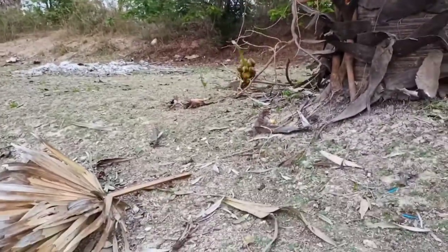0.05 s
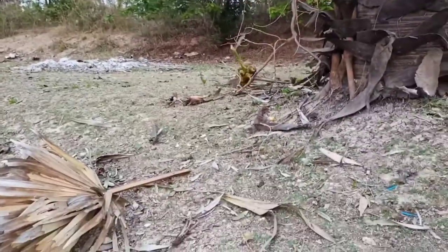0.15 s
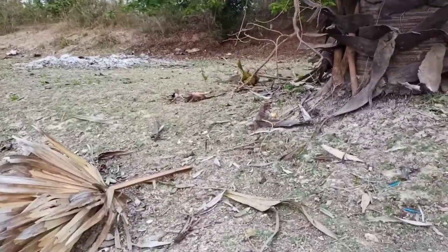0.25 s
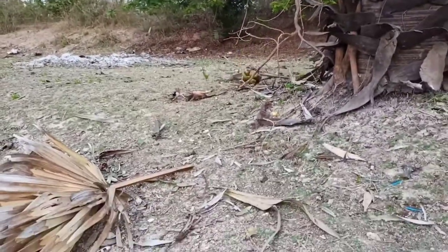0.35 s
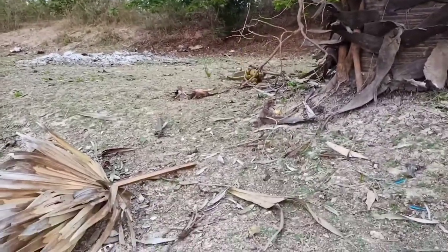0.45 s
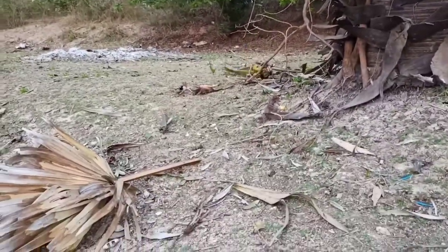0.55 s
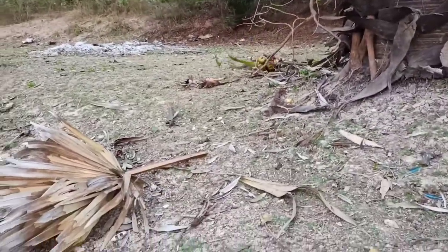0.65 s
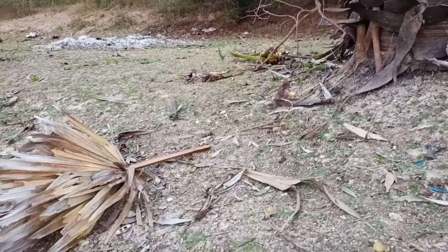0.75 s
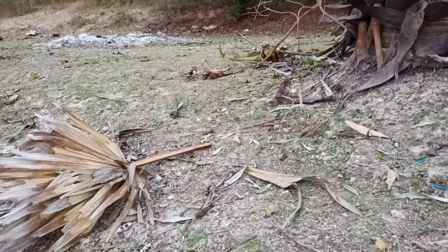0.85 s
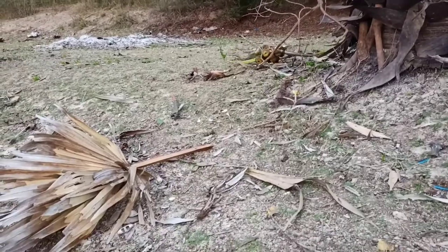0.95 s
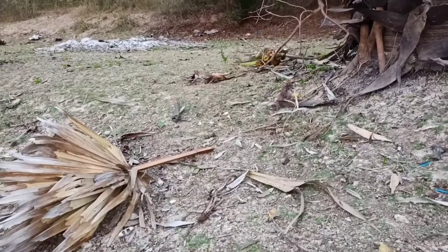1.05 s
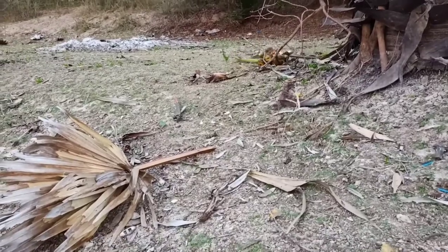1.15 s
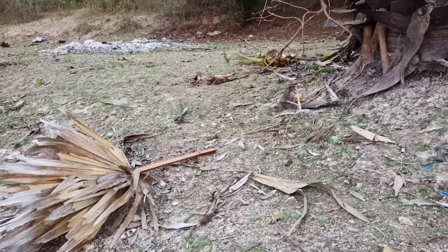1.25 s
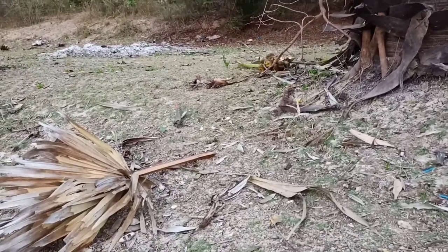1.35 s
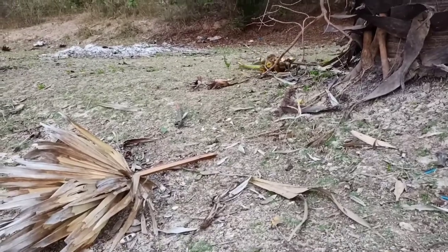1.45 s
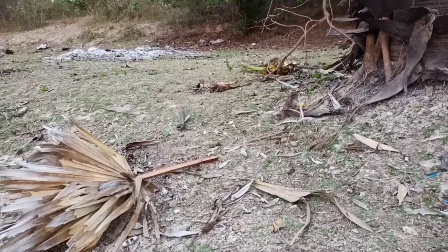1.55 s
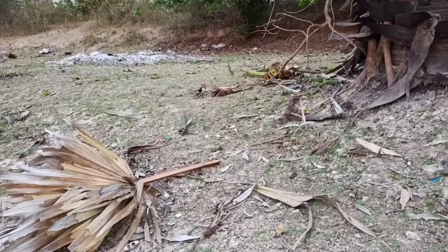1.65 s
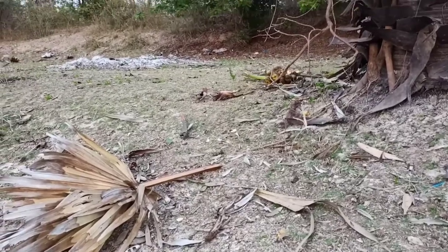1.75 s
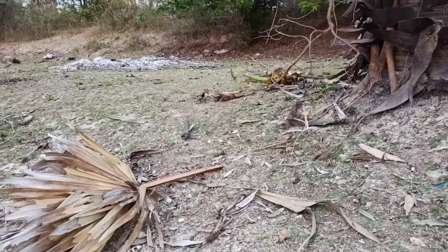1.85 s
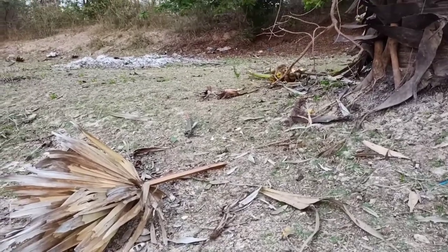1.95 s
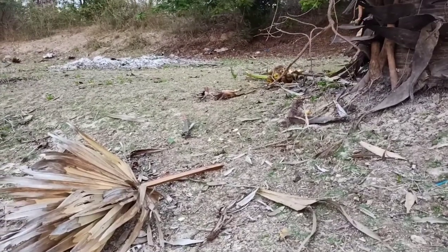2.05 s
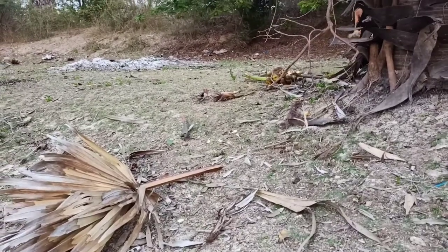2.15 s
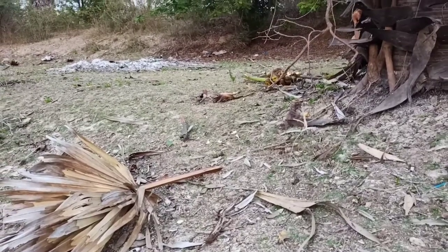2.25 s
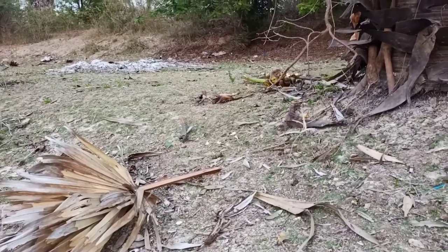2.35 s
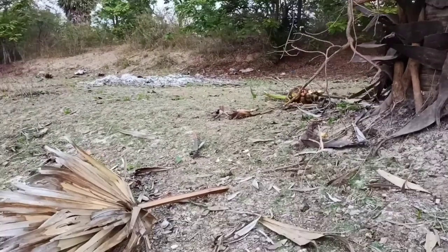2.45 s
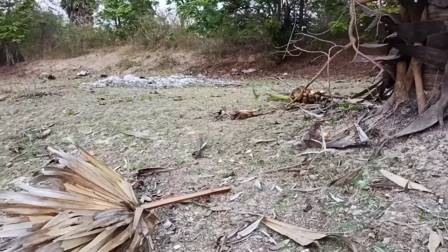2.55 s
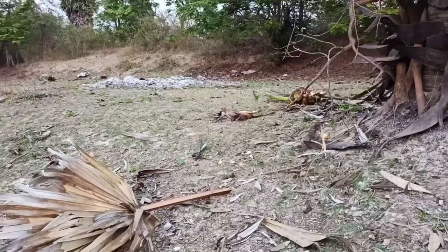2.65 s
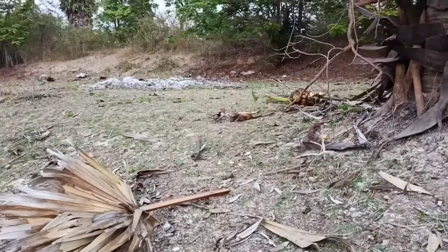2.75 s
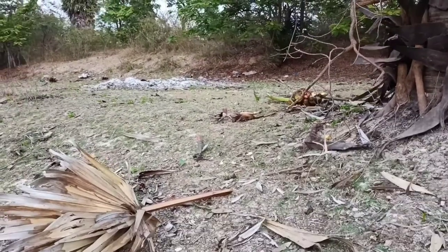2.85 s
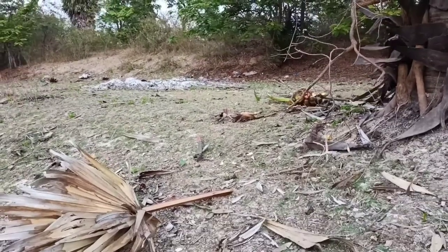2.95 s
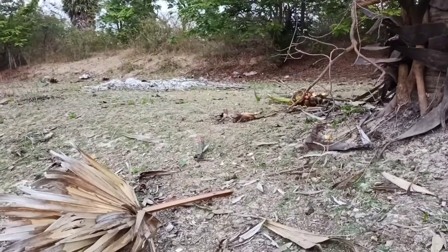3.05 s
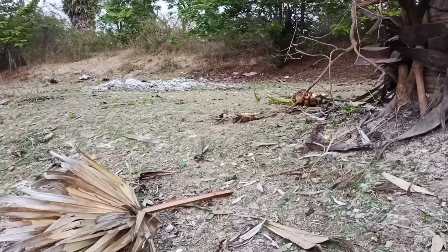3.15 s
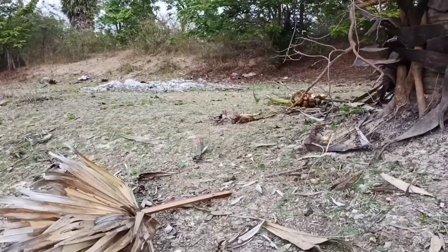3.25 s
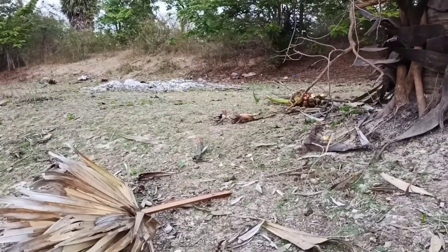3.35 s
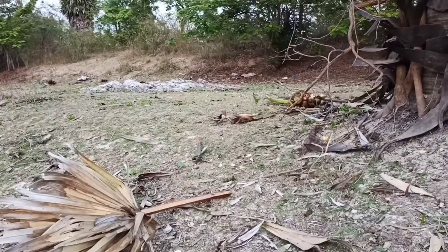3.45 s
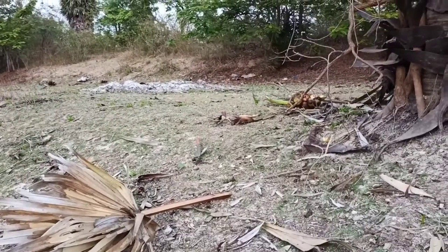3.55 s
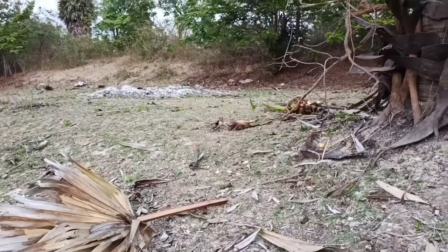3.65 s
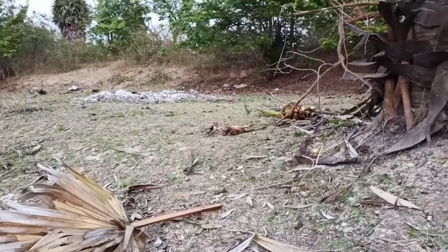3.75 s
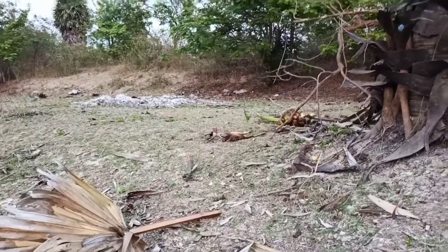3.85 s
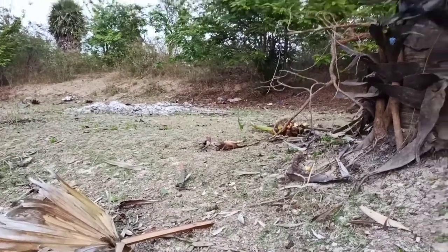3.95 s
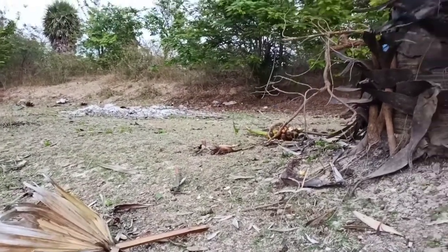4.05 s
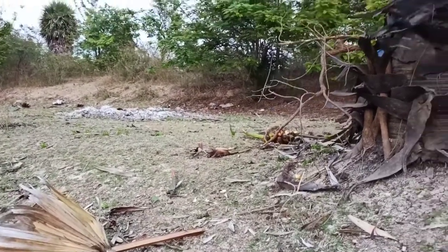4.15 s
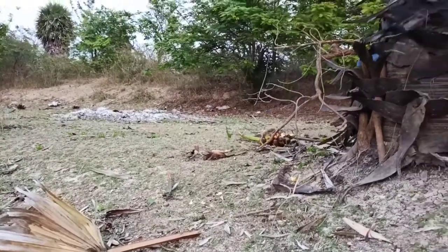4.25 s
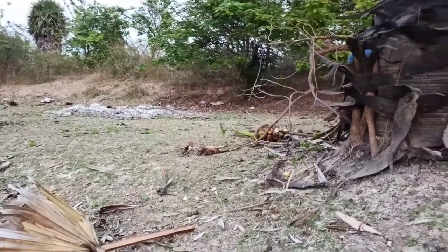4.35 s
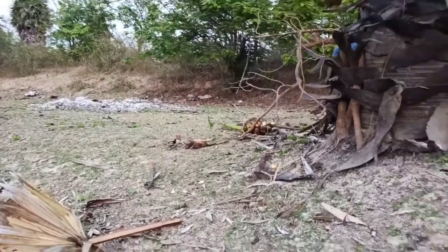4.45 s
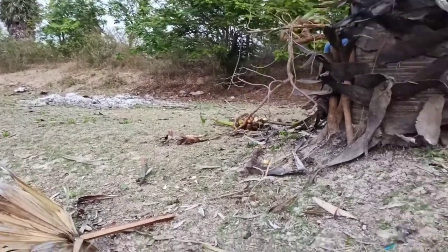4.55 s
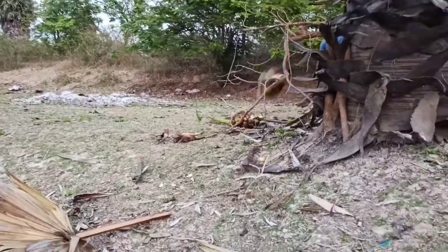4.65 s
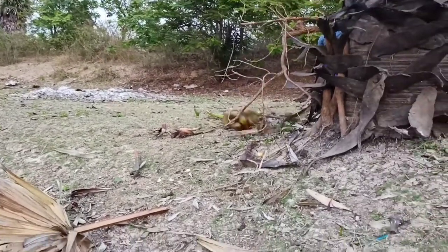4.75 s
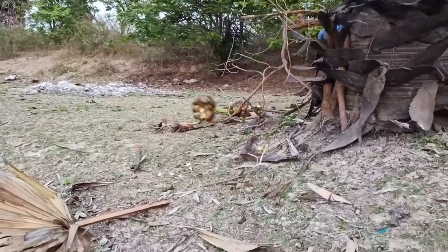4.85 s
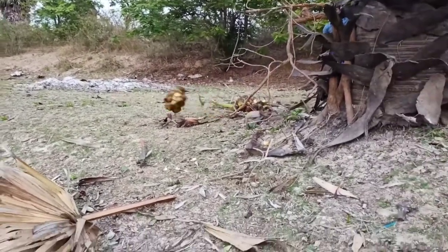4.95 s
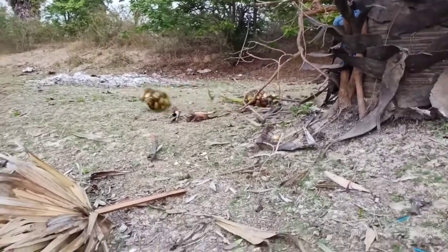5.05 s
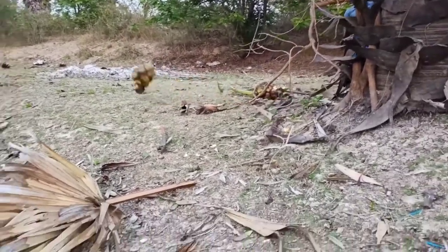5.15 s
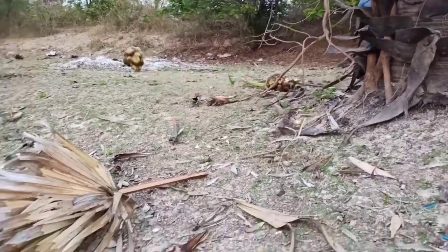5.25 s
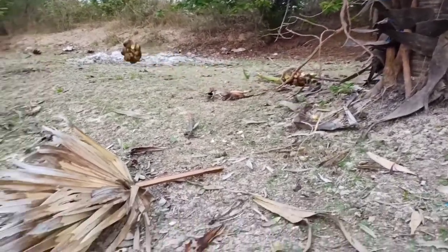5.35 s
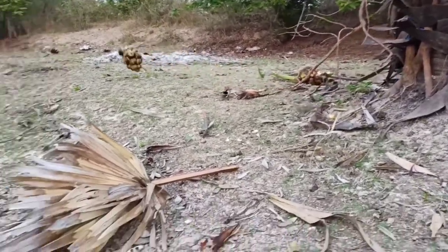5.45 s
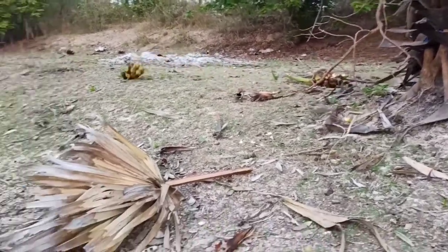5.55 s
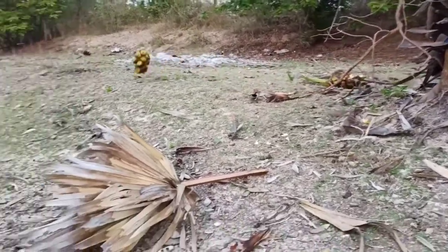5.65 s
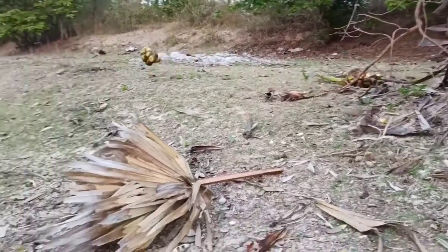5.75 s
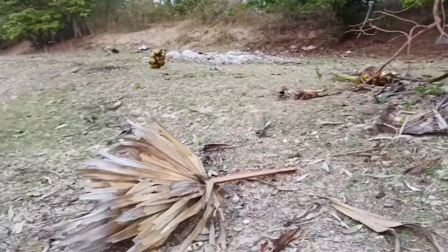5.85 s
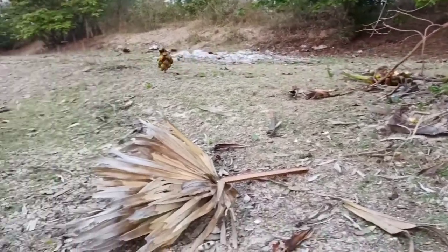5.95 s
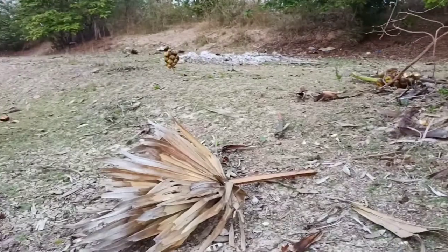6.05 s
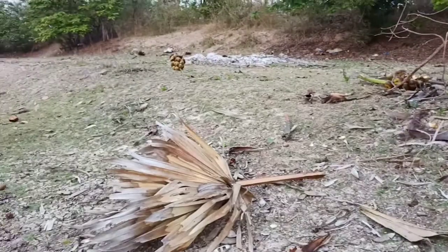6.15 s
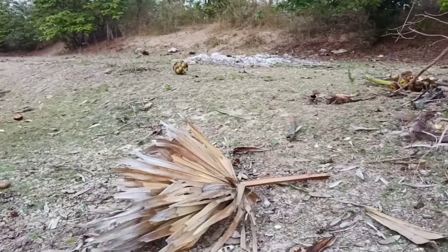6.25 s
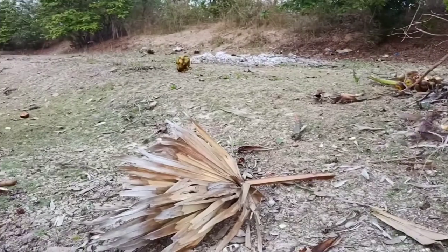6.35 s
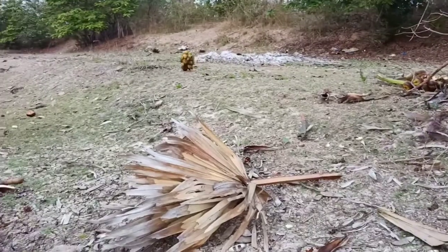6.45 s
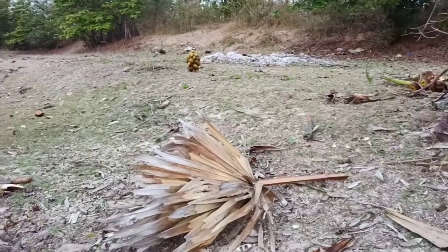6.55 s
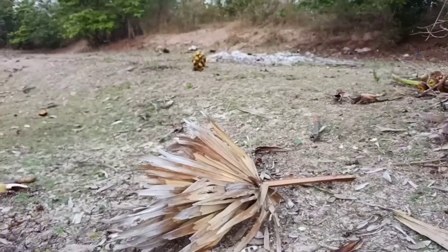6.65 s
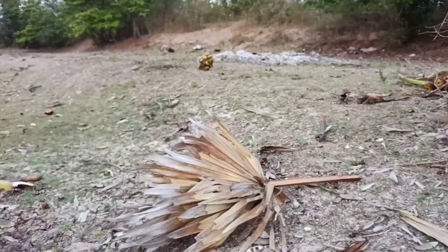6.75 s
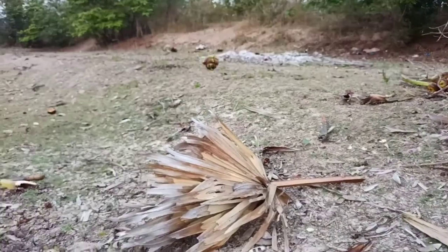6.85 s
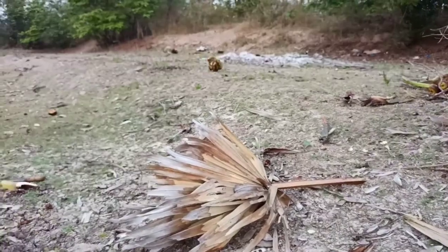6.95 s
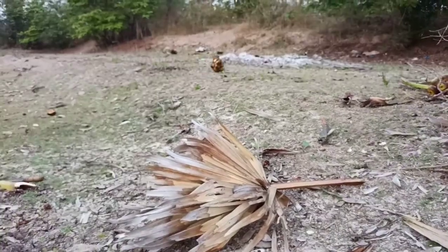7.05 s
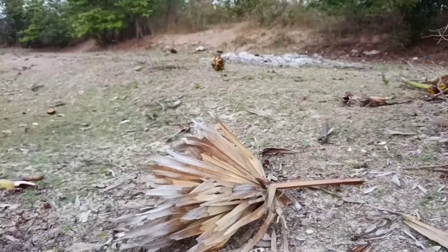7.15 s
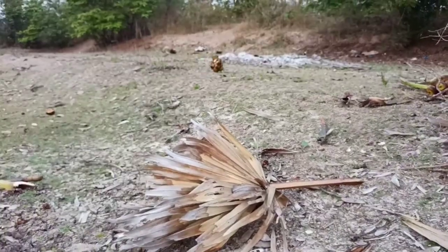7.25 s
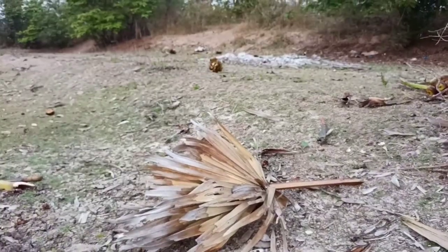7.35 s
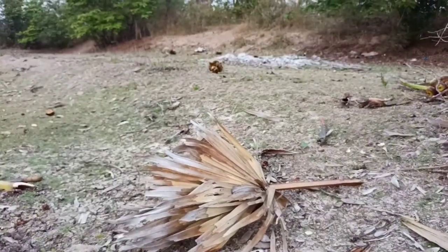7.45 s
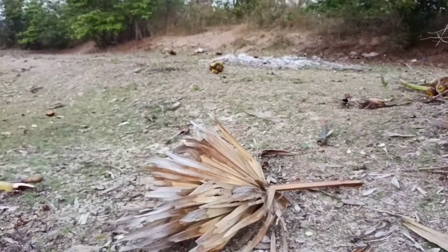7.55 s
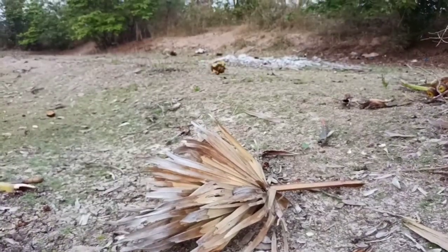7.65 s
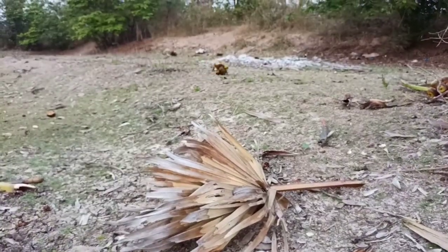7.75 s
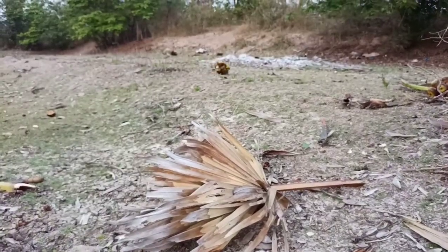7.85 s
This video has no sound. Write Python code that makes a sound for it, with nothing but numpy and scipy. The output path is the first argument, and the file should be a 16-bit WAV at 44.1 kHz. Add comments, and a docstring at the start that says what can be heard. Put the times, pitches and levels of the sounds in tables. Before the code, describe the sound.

Heard on a phone in the open: brisk dry leaf snaps and rustling die away within a second, leaving breeze, faint cicada buzz and far whistling birds. After a momentary total silence, a short woody chop knocks up in a tree. A pause, then a violent burst of splintering leaves, knocking hollow stalks and dull earth thuds as heavy fruit lands and tumbles, thinning to sparse crackles and calm.

```python
"""Heavy fruit bunches drop from a palm onto dry ground and roll through dead fronds, a few metres from a phone.
Close by, dry leaves crack as noise bursts, litter rustles in dense tiny snaps, hollow stalks knock as
decaying modes and the soil thuds in low sagging tones. Behind lie buzzing cicadas, gliding whistles of
far birds and light wind as flickering noise. The sound cuts out for a moment just before a lone chop
up in the crown. Table levels are nominal, ahead of the microphone."""
import sys
import numpy as np
from scipy import signal
from scipy.fft import rfft, irfft, next_fast_len
from scipy.io import wavfile
from scipy.ndimage import uniform_filter1d

SR = 44100
rng = np.random.default_rng(int(sys.argv[2]) if len(sys.argv) > 2 else 0)


def inscribe(sig):
    """Save sig as 16-bit PCM at rate SR to the path in sys.argv[1].

    A 1-D sig is mono; a 2-D sig holds one channel per row.
    Samples are clipped to [-1, 1] before scaling.
    """
    pcm = np.round(np.clip(np.atleast_2d(sig).T, -1, 1) * 32767)
    wavfile.write(sys.argv[1], SR, pcm.astype(np.int16))


N = 347949  # samples


def undb(db):
    """Gain from dB."""
    return 10 ** (np.asarray(db) / 20)


def unit(x):
    """x scaled to rms 1."""
    return x / np.sqrt(np.mean(x ** 2))


def noise(n):
    """White noise of n samples."""
    return rng.standard_normal(n)


def band(x, lo_hz, hi_hz):
    """x band-passed between two frequencies."""
    return signal.sosfilt(signal.butter(2, [lo_hz, hi_hz], "band", fs=SR, output="sos"), x)


def decay(t, t60):
    """Exponential fall by 60 dB in t60 seconds."""
    return 1000. ** (-t / t60)


def colour(x, table):
    """x filtered to a spectrum of (f/Hz, level/dB) points joined over log frequency, rms 1."""
    size = next_fast_len(N)
    hz, db = np.transpose(table)
    f = np.maximum(np.arange(size // 2 + 1) * SR / size, 1)
    gain = undb(np.interp(np.log(f), np.log(hz), db))
    return unit(irfft(rfft(x, size) * gain, size)[:N])


def curves(tables, off_db=-120):
    """Columns of (t/s, level/dB, ..) tables over the whole time; the level is off_db outside the tables."""
    t, out = np.arange(N) / SR, None
    inside = np.zeros(N, bool)
    for table in tables:
        s, *columns = np.transpose(table)
        rows = np.array([np.interp(t, s, c) for c in columns])
        if out is None:
            out = rows * 0 + rows[:, :1]
        out[:, t >= s[0]] = rows[:, t >= s[0]]
        inside |= (t >= s[0]) & (t <= s[-1])
    return np.where(inside, out[0], off_db), *out[1:]


def walk(rate):
    """Random levels held 1 / rate seconds and smoothed twice, rms 1."""
    hold = int(SR / rate)
    steps = np.repeat(noise(N // hold + 1), hold)
    return unit(uniform_filter1d(uniform_filter1d(steps, hold), hold)[:N])


def add(out, s, sound):
    """Mixes sound into out from time s."""
    i = int(max(s, 0) * SR)
    out[i:i + len(sound)] += sound[:N - i]


def snaps(rate, spread_db, t60):
    """Envelope of tiny decaying snaps of very unequal size, about rate per second at random times, rms 1."""
    chance = rng.random(N) * SR / rate
    size = np.maximum(chance, np.exp(-2.4)) ** (-spread_db * np.log(10) / 20)
    clicks = np.where(chance < 1, size, 0)
    return unit(signal.lfilter([1], [1, -np.exp(-np.log(1000) / (t60 * SR))], clicks))


def leaves():
    """Litter noise in which each part of the spectrum crackles partly on its own."""
    # overall tone of the litter: [f/Hz, level/dB per Hz]
    litter_tone = [(410, -32.5), (700, -15.5), (1050, -18.5), (1660, -14.5), (2840, -12.5), (3900, -9.5),
                   (6570, -6), (9000, -17.5), (14500, -19.5), (16000, -29)]
    together = snaps(150, 6.1, 0.045)
    edges = np.geomspace(500, 17000, 13)  # Hz
    total = np.zeros(N)
    for lo, hi in zip(edges, edges[1:]):
        crackle = 0.55 + 0.25 * together + 0.45 * snaps(55, 10.0, 0.018)
        total += band(noise(N), lo, hi) * crackle
    return colour(total, litter_tone)


def roll():
    """Litter rustles in dense small snaps, stalks rattle and the soil rumbles under the moving bunch."""
    # the bunches dragging through litter, one table per passage:
    # [t/s, rustle level/dB, stalk rattle level/dB re rustle, soil rumble level/dB re rustle]
    passages = [
        [(0, -34, -1, -13), (.264, -39.5, -10, -6), (.448, -42, -11.5, -3), (.612, -43, -7, -1),
         (.744, -56, -12, 2), (1.0, -54.5, -21, 1.5), (1.4, -66, -8, -16.5)],
        [(4.3, -61, -14, 0.5), (4.4, -43.5, -13, 11.5), (4.53, -28, -11.5, -11.5), (4.73, -36.5, -10.5, -5.5),
         (4.82, -37, -21, 2.5), (5.23, -38.5, -15.5, 2), (5.44, -45, -2, -8.5), (5.69, -45.5, -4.5, 3.5),
         (5.86, -56.5, 1, 4), (6.4, -71, 10, 18), (6.9, -87, 10, 12)],
    ]
    # leaves crushed or swept for a moment: [start t/s, length/s, level/dB]
    sweeps = [(0.107, 0.036, -24), (0.225, 0.08, -40), (0.258, 0.071, -46), (0.787, 0.22, -51.5),
              (1.194, 0.11, -41), (1.545, 0.038, -53), (2.487, 0.093, -46), (3.702, 0.076, -61),
              (4.072, 0.12, -49), (4.334, 0.13, -28.5), (4.498, 0.16, -20), (4.743, 0.053, -40),
              (4.809, 0.091, -20), (4.992, 0.15, -40), (5.191, 0.041, -37.5), (5.272, 0.032, -33),
              (5.506, 0.03, -40), (5.646, 0.032, -26), (5.994, 0.15, -47), (6.338, 0.09, -48),
              (6.793, 0.17, -55.5)]
    db, rattle_db, rumble_db = curves(passages)
    litter = leaves()
    rattle = unit(band(noise(N), 150, 900)) * (0.47 + 0.58 * snaps(51, 3.9, 0.057))
    rumble = unit(band(noise(N), 37, 210)) * undb(2.8 * walk(30))
    out = undb(db) * (litter + undb(rattle_db) * rattle + undb(rumble_db) * rumble)
    # crushed leaves are fuller between these two frequencies
    crushed = 0.65 * litter + 0.52 * band(litter, 1200, 7500) + 0.29 * rattle
    for s, length, sweep_db in sweeps:
        i, n = int(s * SR), int(length * SR)
        shape = signal.windows.tukey(n, .45) * np.exp(-.8 * np.arange(n) / n)
        add(out, s, undb(sweep_db) * crushed[i:i + n] * shape)
    return out


def air():
    """Wind in the trees, its spectrum flickering part by part, faint leaf ticks and a far cicada chorus."""
    # background over time: [t/s, level/dB]
    wind_level = [(0, -57), (1.3, -53), (2.4, -55), (2.59, -60), (3.3, -60.5), (4.05, -65), (4.6, -45.5),
                  (6, -56), (7.89, -57)]
    # tone of the wind: [f/Hz, level/dB per Hz]
    wind_tone = [(21, -40), (35, -9.5), (129, -1.5), (334, -10), (800, -13.5), (1050, -20.5), (1590, -16),
                 (2280, -21), (3800, -19), (5600, -23), (7600, -21.5), (8650, -33), (14800, -38),
                 (16000, -42)]
    chorus_db = -18  # re wind
    edges = np.geomspace(20, 17000, 15)  # Hz
    wind = np.zeros(N)
    for lo, hi in zip(edges, edges[1:]):
        flicker_db = 2.5 if hi < 300 else 1.6
        part = band(noise(N), lo, hi) * undb(flicker_db * walk(9))
        if lo > 2000:
            part *= 1 + 0.19 * snaps(5, 4., .05)  # leaf ticks
        wind += part
    chorus = np.zeros(N)
    for hz in (7150, 7380, 7600):
        buzz = unit(band(band(noise(N), hz - 180, hz + 180), hz - 300, hz + 300))
        chorus += buzz * undb(chorus_db + 3.5 * walk(7))
    return undb(curves([wind_level])[0]) * (colour(wind, wind_tone) + chorus)


def grains(n, hz, spread, count):
    """A few splinters, each a narrow band of noise at a chance pitch round hz."""
    pitch = np.clip(hz * np.exp(spread * noise(count)), 800, 15000)
    return unit(sum(unit(band(noise(n), f * .96, f * 1.04)) for f in pitch))


def cracks():
    """Each snap is a splintering burst of broad noise with a weak tail; the broken piece rings on a little."""
    # dry leaves and twigs snapping:
    # [t/s, peak level/dB, brightest f/Hz, low mids level/dB re peak, burst t60/s]
    snap_events = [(0.0364, -14, 3800, -23, .029), (0.072, -22, 4020, -6, .01),
                   (0.112, -11.5, 4100, -13, 0.024), (0.1174, -19, 4940, -2, 0.049),
                   (0.1231, -5.5, 3760, -16, 0.0085), (0.1436, -15, 3760, -14, 0.032),
                   (0.2206, -16, 5950, -27, 0.031), (0.251, -18, 6200, -18, 0.021),
                   (0.2854, -15, 4330, -14, 0.036), (0.2913, -18, 3550, -12.5, 0.051),
                   (0.3583, -16, 6160, -24, .02), (0.3717, -15.5, 6100, -34.5, 0.013),
                   (0.3745, -9, 4270, -26.5, 0.023), (0.4004, -23.5, 7570, -39, 0.019),
                   (0.4714, -10, 6900, -33, 0.018), (0.4774, -17.5, 5800, -29.5, .016),
                   (0.4868, -7.5, 6610, -49, 0.0094), (0.5275, -29.5, 4770, -11.5, 0.1),
                   (0.5616, -15, 4600, -35, 0.027), (0.6107, -30, 4890, -31, .02),
                   (0.7766, -32, 7600, -28, 0.056), (0.8436, -40, 7250, -25, .02),
                   (0.873, -35, 6840, -36, 0.11), (1.0578, -32.5, 6300, -11, 0.015),
                   (1.2271, -20.5, 6600, -28, 0.026), (1.9572, -43, 3560, 1, 0.043),
                   (2.7568, -36.5, 7000, -30, 0.026), (4.0976, -34, 4120, -6.5, 0.11),
                   (4.352, -22.5, 2700, -5, 0.036), (4.3891, -18.5, 6550, -3.5, 0.1),
                   (4.42, 2, 6630, -34.5, 0.015), (4.4968, -0.5, 2680, -4.5, 0.023),
                   (4.5177, -2, 7000, -7.5, 0.027), (4.545, -10.5, 4840, -3.5, 0.022),
                   (4.5617, -6, 2250, -3.5, 0.028), (4.5856, -9.5, 3850, -6, .055),
                   (4.5963, -3.5, 6450, 0, 0.013), (4.6763, -16.5, 6640, -22.5, 0.019),
                   (4.7536, -12, 2180, -5, 0.02), (4.773, -12, 5770, -29, 0.019),
                   (4.7931, -8.5, 5830, -15.5, 0.011), (4.8312, 3, 4300, -16, 0.02),
                   (4.863, -16.5, 6160, -18.5, 0.016), (4.8979, -12, 5770, -4, .049),
                   (5.0305, -21, 5860, -17, .023), (5.05, -17.5, 4000, -26, 0.025),
                   (5.068, -12.5, 4880, -20, 0.031), (5.0844, -13.5, 2380, -37, 0.015),
                   (5.1003, -7.5, 3760, -21, .016), (5.1402, -21.5, 4240, -7, 0.058),
                   (5.1818, -17, 4070, -4.5, 0.033), (5.1961, -13, 5600, -2, 0.047),
                   (5.225, -10.5, 6070, -18, 0.025), (5.3139, -10.5, 2430, -39, 0.02),
                   (5.3887, -14, 6050, -17.5, 0.039), (5.4458, -5.5, 6700, -16.5, 0.013),
                   (5.5079, -23.5, 7000, -16, 0.029), (5.5731, -21.5, 5440, -11, 0.013),
                   (5.6007, -13, 5900, -46, 0.0085), (5.6495, -15.5, 1940, -3, 0.064),
                   (5.715, -32, 4700, -21, .011), (5.7425, -8.5, 4800, -9, 0.01),
                   (5.7716, -17.5, 3330, -7, 0.021), (5.787, -24.5, 3540, -9.5, 0.073),
                   (5.846, -24.5, 5370, -10, 0.027), (6.02, -20.5, 4520, -8.5, 0.044),
                   (6.099, -39.5, 2700, 12, 0.027), (6.351, -31, 4055, 2, 0.046),
                   (6.437, -46.5, 3740, 8.5, .029), (6.9092, -38.5, 3163, -2, .038),
                   (7.643, -46.5, 7310, -6, .03)]
    # treble of the snaps over time: [t/s, level/dB re peak]
    snap_treble = [(0, -14), (.4, -15.5), (.6, -9.5), (1.3, -6), (4.0, -25.5), (4.8, -16.5), (5.1, -39),
                   (5.45, -11.5), (5.61, -13), (5.65, -25), (7.9, -42)]
    rise_s = .0024
    crest_db, ring_db = 8, -2.5  # nominal peak of a snap over its rms; ring of the broken piece
    out, t = np.zeros(N), np.arange(SR // 10) / SR
    size = (len(snap_events), len(t))
    mids = unit(band(band(noise(size), 3600, 7600), 2900, 9000))
    lows = unit(band(noise(size), 1400, 2500))
    tops = unit(band(noise(size), 8800, 15500))
    # fibres part in quick succession, so the burst is lumpy
    lumps = undb(1.8 * unit(uniform_filter1d(noise(size), size=50)))
    after = np.maximum(t - rise_s, 0)
    for k, (s, db, hz, low_db, t60) in enumerate(snap_events):
        t60 = max(t60, .005)
        low_mids = 0.74 * lows[k] + 0.73 * grains(len(t), 1600, .3, count=2)
        top_db = np.interp(s, *np.transpose(snap_treble))
        burst = 0.5 * mids[k] + undb(low_db) * low_mids + undb(top_db) * tops[k]
        # the lumpy main fall, a quick start and a long weak tail
        fall = decay(after, t60) * lumps[k] + 0.46 * decay(after, t60 / 7)
        fall += undb(-12.5) * decay(after, t60 * 6)
        ring = unit(band(noise(len(t)), hz * 0.85, hz * 1.128)) + 0.35 * grains(len(t), hz, 0.3, count=2)
        snap = burst * fall + undb(ring_db) * ring * decay(after, t60 * 1.8)
        rise = np.minimum(t / rise_s, 1) ** 2
        add(out, s + 0.00075 - rise_s, undb(db - crest_db) * snap * rise)
    return out


def thuds():
    """The soil gives under the weight: a few low cycles that sag in pitch."""
    # bunches landing on soil: [t/s, level/dB before the decay, settled pitch f/Hz]
    landings = [(0.112, -27, 92), (0.208, -37, 93), (0.289, -23.5, 76.5), (0.369, -32, 87.6),
                (4.416, -14, 177), (4.499, -14, 189), (4.569, -30, 159), (4.775, -24.5, 178.6),
                (4.819, -20.5, 105), (4.899, -26, 104), (4.978, -25, 102), (5.026, -18.5, 124),
                (5.042, -15.5, 90), (5.086, -19, 66.7), (5.195, -19, 180), (5.207, -12, 68.4),
                (5.28, -22, 122.3), (5.316, -18.5, 69), (5.445, -29, 112), (5.643, -27.5, 110),
                (6.028, -20.5, 78.4), (6.353, -33, 70.1), (6.913, -44.5, 143)]
    out, t = np.zeros(N), np.arange(SR // 3) / SR
    shape = (1 - np.exp(-t / 0.003)) * decay(t, 0.11)
    for s, db, hz in landings:
        cycles = hz * (t + 0.0035 * (1 - np.exp(-t / 0.038)))
        add(out, s - .005, undb(db) * np.sin(2 * np.pi * cycles) * shape)
    return out


def cicadas():
    """Narrow noise bands buzz as chirrs, each answered by a higher, softer one; all throb quickly."""
    # chirrs: [start t/s, level/dB before the throb]
    chirrs = [(0.118, -48), (0.718, -53), (1.32, -56.5), (1.951, -54), (2.501, -69.5), (3.048, -69.5),
              (3.66, -68), (5.98, -63), (6.72, -68), (7.48, -66)]
    chirr_s, chirr_hz = .3, 7040
    answer_hz, answer_db = 7230, -5.5  # level re chirr
    throb_hz = 150 * (1 + 0.031 * walk(2.5))
    throb = 1 + 0.7 * np.sin(2 * np.pi * np.cumsum(throb_hz) / SR)
    out, n = np.zeros(N), int(chirr_s * SR)
    for s, db in chirrs:
        for late, hz, less_db in ((0, chirr_hz, 0), (.95 * chirr_s, answer_hz, answer_db)):
            buzz = band(band(noise(SR // 2)[:n], hz - 260, hz + 260), hz - 450, hz + 450)
            add(out, s + late, undb(db + less_db) * unit(buzz) * signal.windows.tukey(n, .65))
    return out * throb * undb(1.5 * walk(12))


def birds():
    """Gliding whistles, blurred by distance and trailed by echoes."""
    # far whistles: [start t/s, length/s, from f/Hz, to f/Hz, level/dB before the blur]
    whistles = [(1.14, 0.11, 2150, 1850, -56), (1.539, 0.094, 3500, 3020, -54.5),
                (1.622, 0.044, 3600, 3460, -57), (1.853, .07, 2650, 2600, -64),
                (2.203, 0.38, 1550, 1708, -59), (3.357, .1, 3450, 3000, -77),
                (3.506, 0.11, 2690, 2140, -73), (3.602, 0.042, 2100, 2070, -68),
                (5.962, 0.043, 4900, 5000, -58), (6.137, 0.035, 4070, 4020, -54.5),
                (6.228, 0.028, 4300, 3900, -57), (6.824, 0.025, 4000, 3920, -52),
                (7.132, 0.091, 2800, 3000, -67.5), (7.203, 0.092, 2700, 2400, -66.5),
                (7.308, 0.085, 2500, 2000, -61), (7.745, 0.015, 2496, 2550, -56),
                (7.794, 0.038, 3150, 3100, -61)]
    out, warble = np.zeros(N), 1 + .02 * walk(90)
    for s, length, from_hz, to_hz, db in whistles:
        n = int(length * SR)
        blur = undb(4 * unit(uniform_filter1d(noise(SR), size=200))[:n])
        glide_hz = np.linspace(from_hz, to_hz, n) * warble[:n]
        whistle = np.sin(2 * np.pi * np.cumsum(glide_hz) / SR)
        add(out, s, undb(db) * blur * np.hanning(n) ** .5 * whistle)
    t = np.arange(SR // 4) / SR
    echo = noise(len(t)) * decay(t, 0.29)
    return out + undb(-34) * signal.fftconvolve(out, echo)[:N]


def chops():
    """The stalk's hollow ring starts with a click and swells; the blade rattles roughly a moment later."""
    # a blade chopping a stalk up in the crown, and its rebound: [t/s, level/dB]
    blows = [(2.48, -13.5), (2.525, -31.5)]
    # modes of stalk (below 1 kHz) and blade (above): [f/Hz, level/dB re blow, t60/s]
    chop_modes = [(118, -12, 0.091), (259, 0.5, 0.047), (322, 2.5, 0.058), (409, -5, 0.058),
                  (2810, -11.5, 0.075), (4060, -15, 0.044), (4600, -23.5, 0.028)]
    out, t = np.zeros(N), np.arange(SR // 4) / SR
    swell = 1 - 0.66 * np.exp(-t / 0.0017)
    for s, db in blows:
        for hz, mode_db, t60 in chop_modes:
            fall = undb(db + mode_db) * decay(t, t60)
            if hz < 1000:
                add(out, s, -np.cos(2 * np.pi * hz * t) * swell * fall)
            else:
                rattle = unit(band(noise(len(t)), hz * 0.884, hz * 1.076))
                add(out, s + 0.00197, rattle * np.minimum(t / 0.00085, 1) * fall)
    return out


def knocks():
    """Hollow stalks ring briefly in several modes; a soft contact lets the ring build up."""
    # hollow stalks struck: [t/s, level/dB, pitch f/Hz, t60/s]
    strikes = [(4.324, -25, 410, .11), (4.387, -2, 393, .036), (4.414, -3.5, 360, .045),
               (4.422, -11.5, 310, .03), (4.434, -10, 377, .095), (4.489, -5, 385, .083),
               (4.519, -20, 401, .11), (4.544, -8.5, 415, .06), (4.562, -5.5, 417.6, .1),
               (4.574, -9.5, 452, .079), (4.596, -7, 700, 0.034), (4.615, -13.5, 380, 0.09),
               (4.648, -25, 510, 0.083), (4.753, -22, 634, .035), (4.831, -12.5, 607, .024),
               (4.893, -16.5, 234, .022), (5.004, -32, 805, .036), (5.091, -28.5, 818, .058),
               (5.182, -17, 277, .055), (5.649, -23.5, 272, .065), (6.354, -40.5, 332, 0.04)]
    # modes of a stalk, varied by chance at each knock: [multiple of pitch, level/dB]
    stalk_modes = [(1.002, -1.5), (0.779, -17), (1.3, -9.5), (1.899, -14.5), (2.3, -20), (3.599, -24)]
    contact_s = 0.0054  # how long a blow pushes
    out, t = np.zeros(N), np.arange(SR // 3) / SR
    after = np.maximum(t - contact_s, 0)
    for s, db, hz, t60 in strikes:
        ring = np.zeros(len(t))
        for multiple, mode_db in stalk_modes:
            gain = undb(mode_db + 4.2 * rng.standard_normal())
            # only modes above the pitch are detuned; higher modes die sooner
            detune = 1 + 0.034 * rng.standard_normal() * (multiple > 1)
            tone = np.sin(2 * np.pi * hz * multiple * detune * t)
            ring += gain * tone * decay(after, max(t60, .01) / multiple ** 0.19)
        add(out, s - .002, undb(db) * ring * np.minimum(t / contact_s, 1))
    return out


def scene():
    """Hits come back faintly off the trunk and the bank; litter, cicadas, birds and wind are heard direct."""
    hits = chops() + cracks() + knocks() + thuds()
    t = np.arange(SR // 3) / SR
    echo = band(noise(len(t)), 150, 7000) * decay(t, 0.059) * (t > .004)
    echoes = undb(-38.5) * signal.fftconvolve(hits, echo)[:N]
    return (hits + echoes + roll() + cicadas() + birds() + air())[None]


def record(dry):
    """The phone loses the deep bass, rounds the loudest peaks, drops out briefly and cuts the top."""
    # the drop-out: [start t/s, end t/s]
    cut_out = (2.332, 2.450)
    t = np.arange(N) / SR
    on = np.clip(np.maximum(cut_out[0] - t, t - cut_out[1]) / 0.00038, 0, 1)  # edges of 0.38 ms
    heard = signal.sosfilt(signal.butter(2, 50., "high", fs=SR, output="sos"), dry)
    heard = signal.sosfilt(signal.butter(4, 15300., fs=SR, output="sos"), heard)
    rounded = np.tanh(0.74 * heard) / 0.92
    return signal.sosfilt(signal.ellip(10, .2, 70, 16300, fs=SR, output="sos"), on * rounded)


dry = scene()
out = record(dry)
inscribe(out)
```